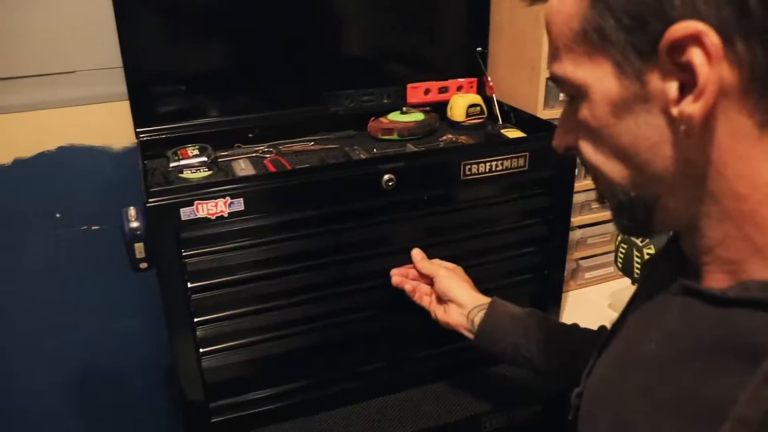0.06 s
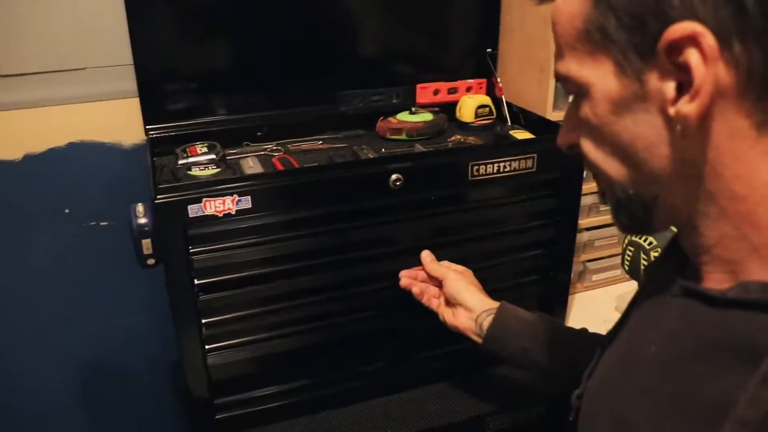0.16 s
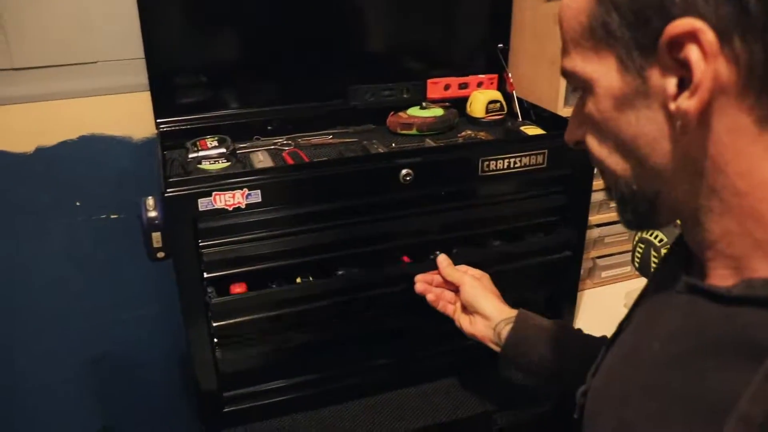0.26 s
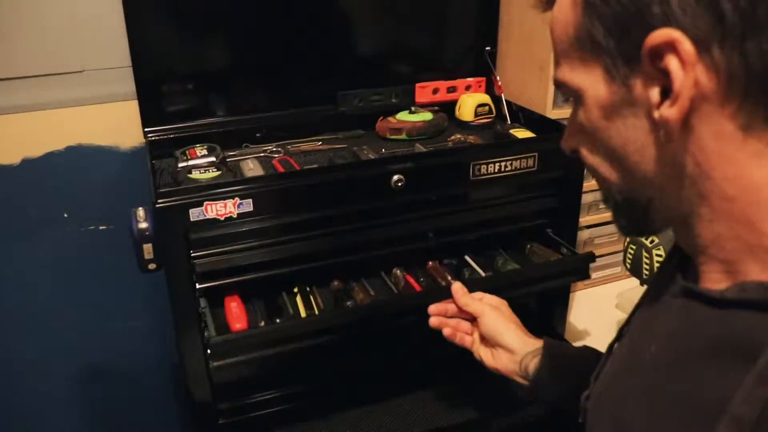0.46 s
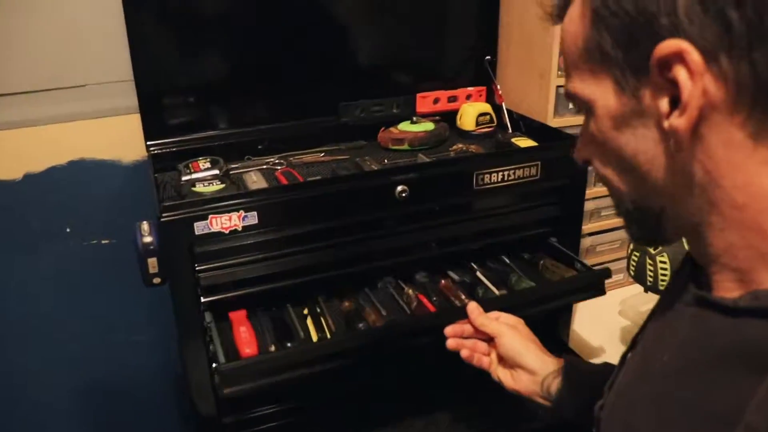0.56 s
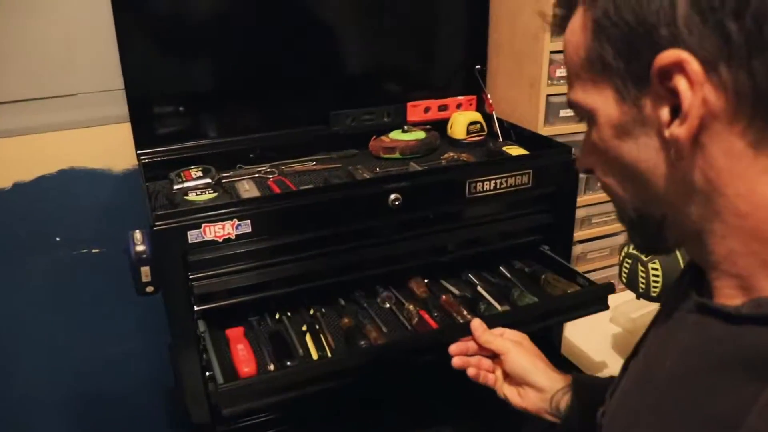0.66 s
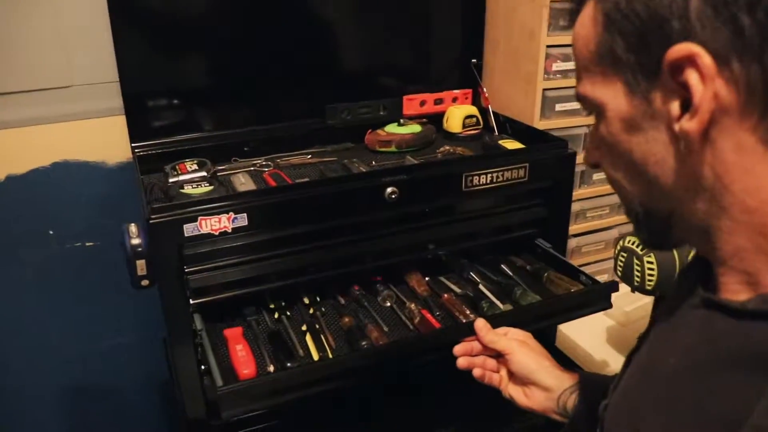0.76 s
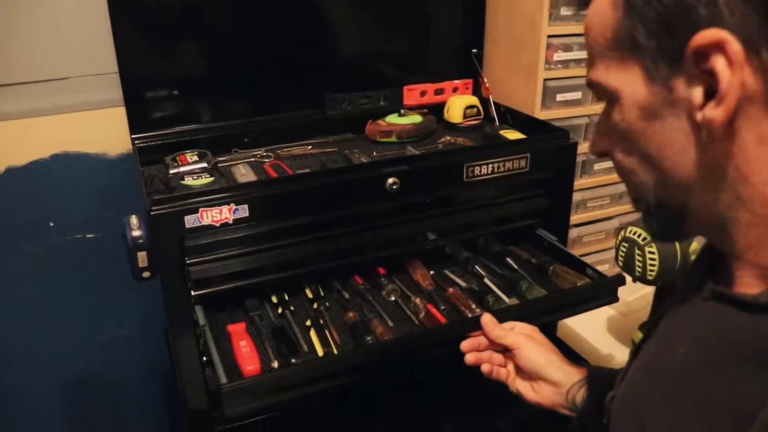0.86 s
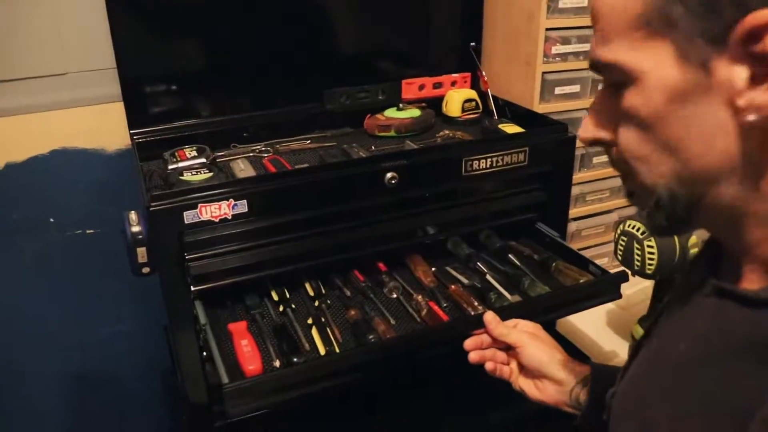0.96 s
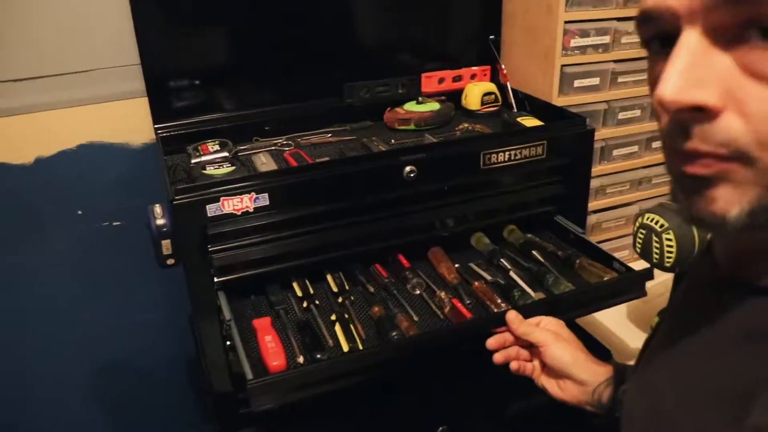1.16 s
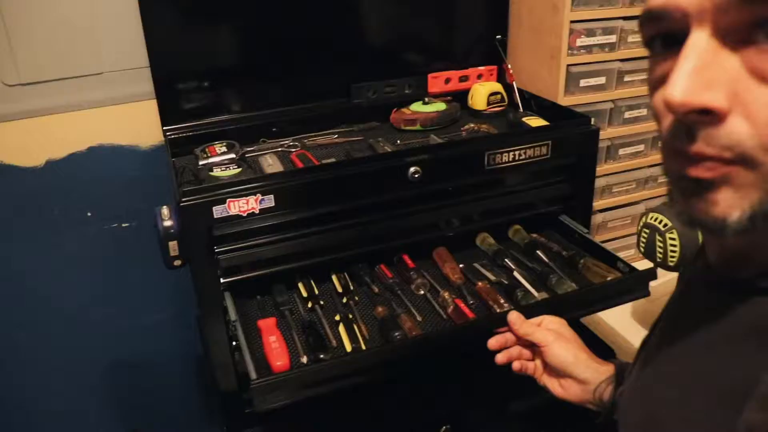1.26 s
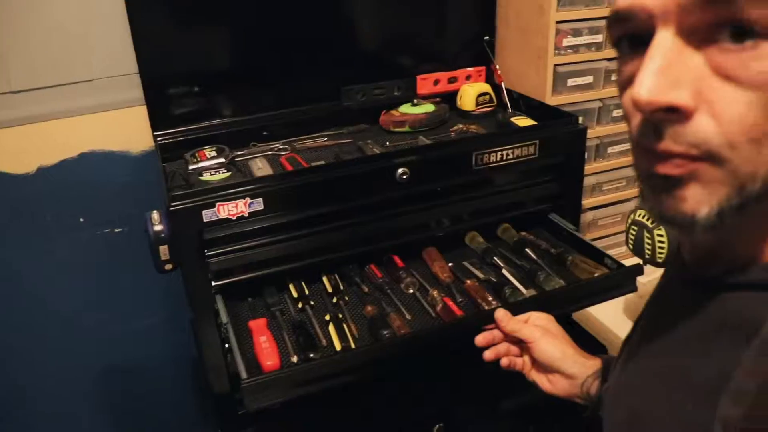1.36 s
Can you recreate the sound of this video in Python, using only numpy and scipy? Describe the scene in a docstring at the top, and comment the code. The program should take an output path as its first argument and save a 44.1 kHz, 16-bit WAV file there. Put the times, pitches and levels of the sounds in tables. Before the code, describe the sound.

One metal drawer opening, heard close: a light knock, a scrape and tiny squeak, a loud sheet-metal bang with tools jostling, quieter rolling, a sharp end-stop clack, then faint handling over low room hum and hiss.

```python
"""Small workshop: a drawer of a steel tool chest is pulled open, over low hum and hiss.
Its slides scrape and squeak, jump the catch with a sheet-metal boom and shake the screwdrivers inside;
it rolls out on ball bearings and clacks against its end stops. Light knocks come before and after.
Blows excite decaying modes plus shaped noise; rolling, rattle and rub are random clicks through such
bodies; the squeak is a wavering sine, the room shaped noise and steady tones."""
import sys
import numpy as np
from scipy import signal
from scipy.fft import rfft, irfft, next_fast_len
from scipy.io import wavfile
from scipy.ndimage import uniform_filter1d

SR = 44100
rng = np.random.default_rng(int(sys.argv[2]) if len(sys.argv) > 2 else 0)


def dump(signal):
    """Clip the signal to [-1, 1] and save it as 16-bit WAV at the path in sys.argv[1]."""
    limited = np.clip(np.atleast_2d(signal).T, -1, 1)
    pcm = np.round(limited * 32767).astype(np.int16)
    wavfile.write(sys.argv[1], SR, pcm)


N = 61739

# modes of the open drawer: f/Hz, relative level/dB, t60/s
DRAWER_MODES = [(547, -2, .06), (1116, 1, 0.07), (1360, -13, .05), (1660, -2.5, 0.096), (1756, -4, 0.15),
                (2160, -7, .04)]


def undb(db):
    """Decibels to amplitude gain."""
    return 10 ** (np.asarray(db) / 20)


def unit(x):
    """Scale to rms 1."""
    return x / np.sqrt(np.mean(x ** 2))


def clock():
    """Time of each sample in seconds."""
    return np.arange(N) / SR


def fade(curve):
    """Gain over time, linear in dB between (s, dB) points, -200 dB outside them."""
    t_s, db = np.array(curve).T
    return undb(np.interp(clock(), t_s, db, left=-200, right=-200))


def bump(centre_s, length_s):
    """Half-cosine rise and fall, zero outside."""
    return np.cos(np.pi * np.clip((clock() - centre_s) / length_s, -.5, .5))


def colour(x, points):
    """Minimum-phase filter through (Hz, dB) points, built by folding the cepstrum."""
    size = 2 * next_fast_len(N)
    hz, db = np.array(points).T
    bins_hz = np.fft.rfftfreq(size, 1 / SR)
    log_gain = np.log(undb(np.interp(np.log(bins_hz + 1), np.log(hz), db)))
    cepstrum = irfft(log_gain)
    cepstrum[1:size // 2] *= 2
    cepstrum[size // 2 + 1:] = 0
    response = np.exp(rfft(cepstrum))
    return irfft(rfft(x, size) * response)[:N]


def through(x, response):
    """Excite a body by convolution with its impulse response."""
    return signal.fftconvolve(x, response)[:N]


def ring(modes):
    """Exponentially decaying sine modes of alternating sign, nominal starting rms 1."""
    t = clock()
    out = np.zeros(N)
    for k, (hz, db, t60_s) in enumerate(modes):
        decay = undb(db - 60 * t / t60_s)
        out += decay * np.sin(2 * np.pi * hz * t) * (-1) ** k
    power = sum(undb(db) ** 2 for _, db, _ in modes) / 2
    return out / np.sqrt(power)


def wash(points, t60_low_s, t60_high_s, crack_db):
    """Crowded modes and near walls as noise: short crack, then tail with separate low and high decay."""
    t = clock()
    noise = unit(colour(rng.standard_normal(N), points))
    low = signal.sosfilt(signal.butter(1, 2500, fs=SR, output="sos"), noise)
    high = noise - low
    low_tail = low * np.exp(-np.log(1000) * t / t60_low_s)
    high_tail = high * np.exp(-np.log(1000) * t / t60_high_s)
    crack = undb(crack_db) * noise * np.exp(-t / 0.0034)
    return low_tail + high_tail + crack


def strike(blows, modes, ring_db, points, t60_low_s, t60_high_s, crack_db):
    """Blows on one body; a softer contact has a lower low-pass cut-off."""
    out = np.zeros(N)
    tone = undb(ring_db) * ring(modes)
    for t_s, db, cutoff_hz in blows:
        contact = signal.butter(2, min(cutoff_hz, .45 * SR), fs=SR, output="sos")
        body = tone + wash(points, t60_low_s, t60_high_s, crack_db)
        hit = signal.sosfilt(contact, body)
        start = int(t_s * SR)
        out[start:] += undb(db) * hit[:N - start]
    return out


def clicks(per_s, scatter_db):
    """Tiny impacts at random times with random sign and exponential dB scatter."""
    happens = rng.random(N) < per_s / SR
    sign = np.sign(rng.standard_normal(N))
    strength = undb(scatter_db * np.minimum(rng.exponential(size=N), 3))
    return happens * sign * strength


def chest():
    """Blows boom in the sheet-steel modes of chest and drawer."""
    # blows: t/s, relative level/dB, contact cut-off f/Hz
    thumps = [(.109, -14.5, 298), (.141, -25, 395), (.188, -13, 1070), (.226, -9, 700), (.2345, -1.5, 850),
              (.2435, 0.5, 1030), (.2485, 2.5, 1740), (.2535, -0.5, 8000), (.2625, -4.5, 12000),
              (.289, -6.5, 2500), (.328, -4.5, 605), (.341, -23, 505), (.432, -10.5, 460),
              (.707, -22.5, 404), (.7675, -6, 444), (.815, -24, 295), (.864, -9.5, 277),
              (1.376, -20.5, 247)]
    # sheet-steel modes: f/Hz, relative level/dB, t60/s
    chest_modes = [(139, -1.5, 0.37), (230.3, 3.5, 0.32), (271, -14, 0.94), (307.3, -5, 0.58),
                   (415.3, -2, 0.39), (552, -36, 0.56), (645, -22, 0.93), (822, -1.5, 0.45),
                   (884, -16, 0.22), (1011, -12, 0.61), (1173, -14, 0.59), (1393, -4, 0.12),
                   (1663, -5.5, 0.31), (1763, -6.5, 0.43)]
    # dense modes between them: f/Hz, relative spectral level/dB
    chest_wash = [(60, -42.5), (100, -31), (135, -9.5), (185, -8), (270, 3), (370, -5.5), (480, 0.5),
                  (700, -10.5), (1300, -3), (2000, -10.5), (3100, -18), (3600, -21.5), (5000, -25),
                  (8000, -30.5), (11000, -32.5), (16000, -68)]
    level_db, ring_db, t60_s = -22.5, -1, 0.39
    return undb(level_db) * strike(thumps, chest_modes, ring_db, chest_wash, t60_s, t60_s, crack_db=8.5)


def stops():
    """Slides hit catch and end stops: steel modes clack, dense modes clatter."""
    # hits: t/s, relative level/dB, contact cut-off f/Hz
    stop_hits = [(.1390, -16.5, 14000), (.7648, 0, 16200), (.7672, -3, 5000), (.812, -7, 7100),
                 (.8165, -23, 9000)]
    # drawer modes at the stop: f/Hz, relative level/dB, t60/s
    stop_modes = [(208, 16.5, 0.18), (406, -1, 0.076), (1452, 10.5, 0.12), (1542, 9.5, 0.087),
                  (1650, 0, 0.19), (1740, -20, 0.21), (1942, -14, 0.1), (2690, 4, 0.13), (3000, 6.5, 0.12),
                  (4230, 4, 0.14), (4360, -15, 0.14), (4400, -6, 0.086), (7670, -16, 0.22),
                  (8027, -1, 0.12)]
    # clatter: f/Hz, relative spectral level/dB
    stop_wash = [(150, 10), (400, -3), (800, -9.5), (1200, -3.5), (1600, 0), (2400, -2), (3500, -9),
                 (4300, -3), (6300, -11.5), (8200, -6), (10000, -19.5), (16000, -32)]
    level_db, ring_db, crack_db = -27.5, 4, -2
    t60_low_s, t60_high_s = 0.33, 0.2
    return undb(level_db) * strike(stop_hits, stop_modes, ring_db, stop_wash, t60_low_s, t60_high_s, crack_db)


def slides():
    """Ball bearings patter along the rails and ring their modes."""
    # rolling gain: t/s, level/dB
    roll = [(.08, -84), (.11, -46.5), (.18, -50), (.2, -34.5), (.26, -22.5), (.42, -34.5), (.48, -39),
            (.56, -40.5), (.65, -42.5), (.72, -42.5), (.765, -43), (.8, -76)]
    # patter spectrum: f/Hz, relative spectral level/dB
    roll_colour = [(70, -40.5), (130, 2.5), (300, 1), (460, -4), (620, 2), (950, -12), (1400, -6.5),
                   (2200, -10), (2700, -17.5), (4200, -24), (6000, -31), (9000, -34), (14000, -47)]
    # rail modes: f/Hz, relative level/dB, t60/s
    rail_modes = [(270.4, 6.5, 0.26), (431.3, -1.5, 0.35), (527, -3.5, 0.33), (593, -0.5, 0.27),
                  (624, -16, .2), (1036, 3.5, 0.1), (1660, -11, 0.027), (2000, -24, 0.089)]
    balls_per_s, scatter_db, rail_db = 1400, 2, -8.5
    balls = clicks(balls_per_s, scatter_db)
    patter = unit(through(balls, wash(roll_colour, 0.15, 0.17, crack_db=2.5)))
    rails = unit(through(balls, ring(rail_modes)))
    return fade(roll) * (patter + undb(rail_db) * rails)


def squeak():
    """The catch rubs with short whistles, a sine of randomly wavering frequency, before it lets go."""
    # whistles: centre t/s, length/s, peak level/dB rms
    squeaks = [(0.206, 0.044, -46.5), (0.238, .02, -42)]
    centre_hz, waver_rms = 4455, 0.018  # waver as a fraction of centre_hz
    waver = unit(uniform_filter1d(rng.standard_normal(N), size=90))
    hz = centre_hz * (1 + waver_rms * waver)
    tone = unit(np.sin(2 * np.pi * np.cumsum(hz) / SR))
    return tone * sum(undb(db) * bump(t_s, length_s) for t_s, length_s, db in squeaks)


def tools():
    """Screwdrivers stir at the first tug and jostle after the jolt: random clicks through shaped noise."""
    # rattle gain: t/s, level/dB
    rattle = [(.137, -74), (.141, -42.5), (.18, -46.5), (.245, -49), (.265, -25.5), (.285, -28),
              (.33, -32.5), (.37, -42), (.42, -41.5), (.47, -52.5), (.54, -47.5), (.62, -62)]
    # rattle spectrum: f/Hz, relative spectral level/dB
    rattle_colour = [(500, -26), (1200, 12.5), (2200, -1), (3100, 7.5), (3500, -8.5), (4200, -1.5),
                     (6000, -4.5), (8500, -19.5), (11000, -34), (16000, -54)]
    rattles_per_s, scatter_db, t60_s = 1100, 0, 0.072
    hits = clicks(rattles_per_s, scatter_db)
    return fade(rattle) * unit(through(hits, wash(rattle_colour, t60_s, t60_s, crack_db=1)))


def steel_ticks():
    """Steel parts tick together: decaying bursts of band-passed noise."""
    # ticks: t/s, starting level/dB rms, reference f/Hz (band 0.733 to 0.976 of it), t60/s
    ticks = [(0.139, -43, 13400, 0.013), (.271, -36.5, 9800, 0.069), (.3265, -49, 12500, .025),
             (.347, -44, 13000, .02), (.419, -49.5, 11100, .09), (.7652, -40.5, 13500, 0.02),
             (0.813, -31, 2200, .06)]
    out = np.zeros(N)
    for t_s, db, hz, t60_s in ticks:
        age_s = clock() - t_s
        edges_hz = [0.733 * hz, min(0.976 * hz, .48 * SR)]
        band = signal.butter(2, edges_hz, "bandpass", fs=SR, output="sos")
        noise = unit(signal.sosfilt(band, rng.standard_normal(N)))
        decay = (age_s > 0) * np.exp(-np.log(1000) * abs(age_s) / t60_s)
        out += undb(db) * noise * decay
    return out


def knocks():
    """Light knocks on the drawer: its modes and a short crack of noise."""
    # knocks: t/s, relative level/dB, contact cut-off f/Hz
    knock_hits = [(.048, 0.5, 2480), (1.3495, 2.5, 3000), (1.362, -11, 2520), (1.375, -7, 2500),
                  (1.386, -11, 2500)]
    # dense modes: f/Hz, relative spectral level/dB
    knock_wash = [(200, 10), (600, -6.5), (1800, -0.5), (2600, -18.5), (5000, -22), (16000, -36)]
    level_db, ring_db, t60_s, crack_db = -46.5, -3, 0.045, 13
    return undb(level_db) * strike(knock_hits, DRAWER_MODES, ring_db, knock_wash, t60_s, t60_s, crack_db)


def rub():
    """Light rubbing keeps the open drawer ringing: random clicks through its modes."""
    # rub gain: t/s, level/dB
    rub_gain = [(1.352, -53), (1.364, -47.5), (1.4, -46.5)]
    rubs_per_s, scatter_db = 890, 1
    return fade(rub_gain) * unit(through(clicks(rubs_per_s, scatter_db), ring(DRAWER_MODES)))


def room_tone(hz):
    """Steady sine of rms 1 at random phase."""
    return np.sqrt(2) * np.sin(2 * np.pi * (hz * clock() + rng.random()))


def workshop():
    """Rumble and hiss as shaped noise, faint steady tones, and brief swells of low hum."""
    # room noise: f/Hz, relative spectral level/dB
    room_colour = [(12, -25), (20, -2.5), (96, -8), (216, -23), (270, -19), (319, -32), (347, -24),
                   (422, -25.5), (678, -27), (897, -31), (1090, -30), (1190, -33.5), (1860, -37),
                   (3160, -43), (3440, -41.5), (5380, -45.5), (16000, -50.5)]
    # steady tones: f/Hz, level/dB rms
    hum_tones = [(83, -45), (1066, -64.5), (1900, -68.5), (3499, -69.5), (3854, -72), (3914, -76)]
    # hum swells: centre t/s, length/s, f/Hz, peak level/dB rms
    hum_swells = [(0.039, 0.054, 82.7, -34.5), (0.761, 0.089, 85, -26.5), (1, 0.11, 79.86, -29.5)]
    room_db = -39
    air = undb(room_db) * unit(colour(rng.standard_normal(N), room_colour))
    hum = sum(undb(db) * room_tone(hz) for hz, db in hum_tones)
    swells = sum(undb(db) * room_tone(hz) * bump(t_s, length_s) for t_s, length_s, hz, db in hum_swells)
    return air + hum + swells


def scene():
    """Sum of all sources at one microphone."""
    drawer = chest() + stops() + slides() + squeak()
    contents = tools() + steel_ticks()
    handling = knocks() + rub()
    return (drawer + contents + handling + workshop())[None]


def record(dry):
    """The recorder cuts the top: steep elliptic low-pass."""
    top_hz = 15900
    low_pass = signal.ellip(10, .2, 80, top_hz, fs=SR, output="sos")  # .2 dB ripple, 80 dB stop band
    return signal.sosfilt(low_pass, dry)


dry = scene()
out = record(dry)
dump(out)
```